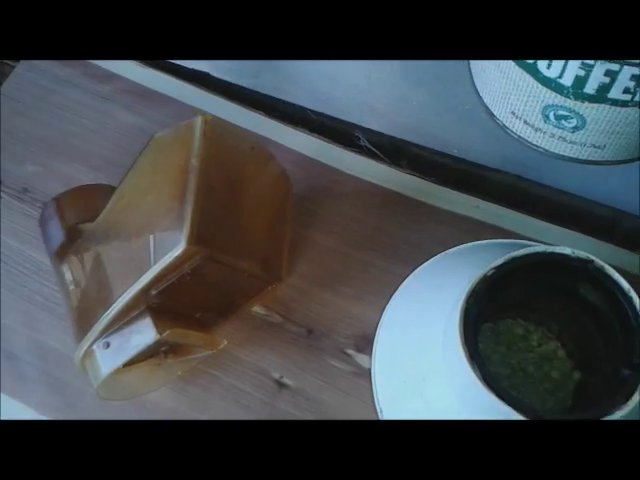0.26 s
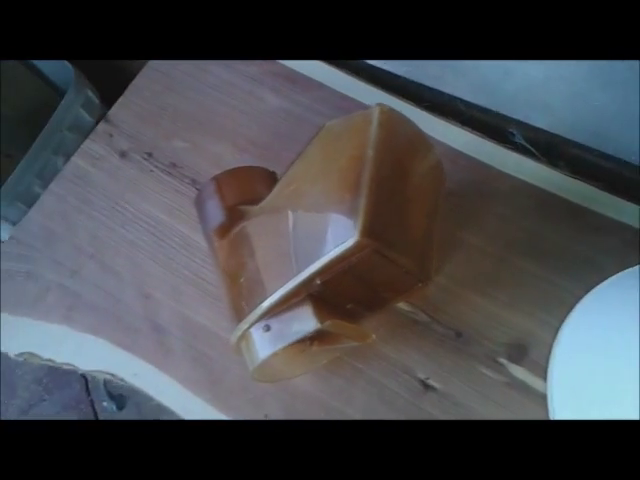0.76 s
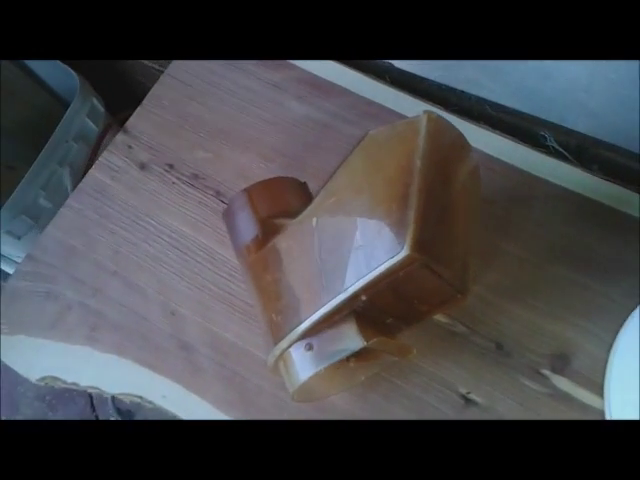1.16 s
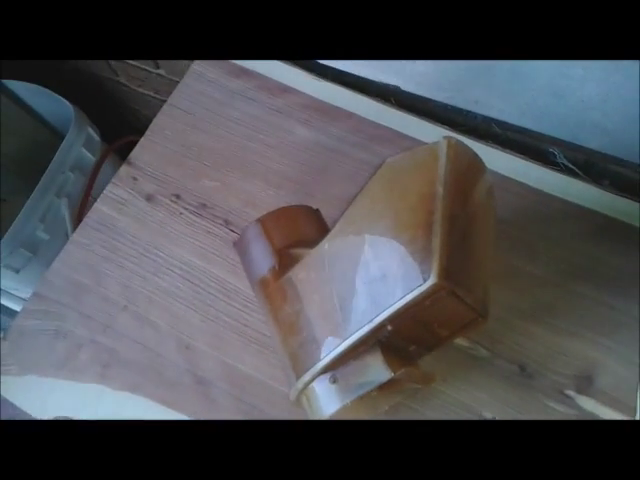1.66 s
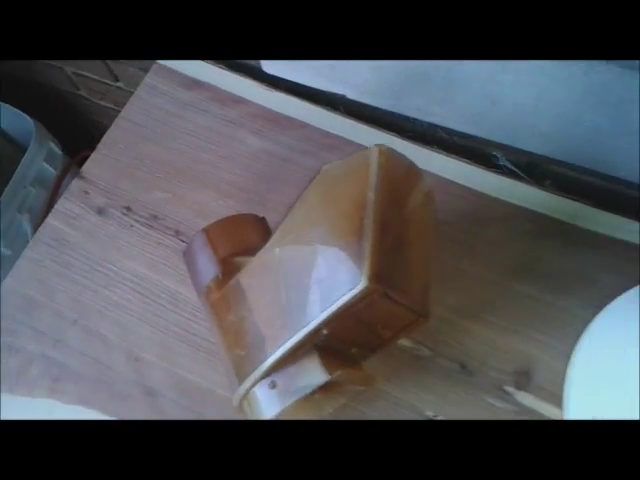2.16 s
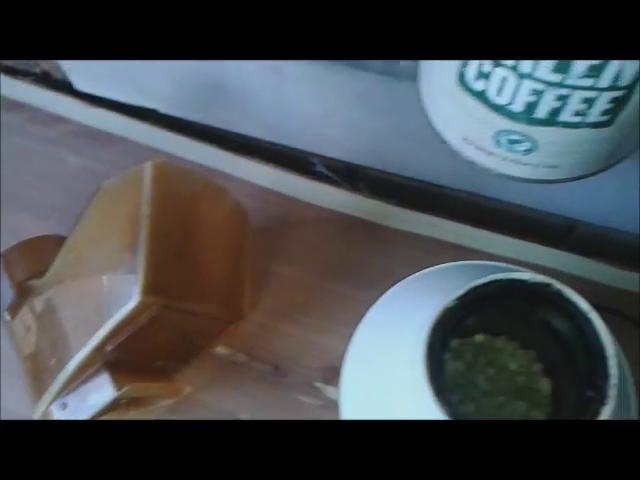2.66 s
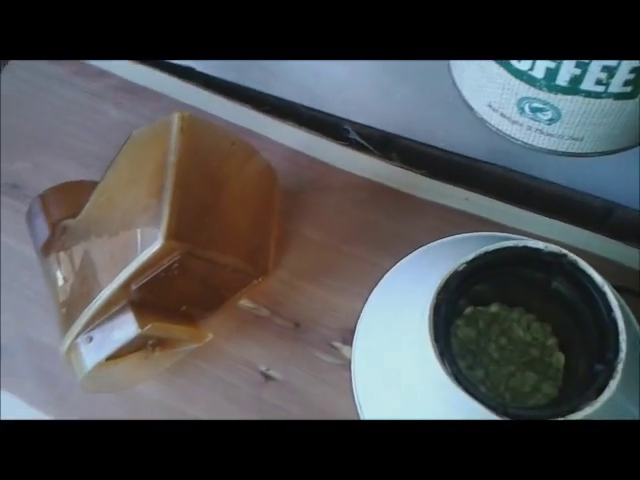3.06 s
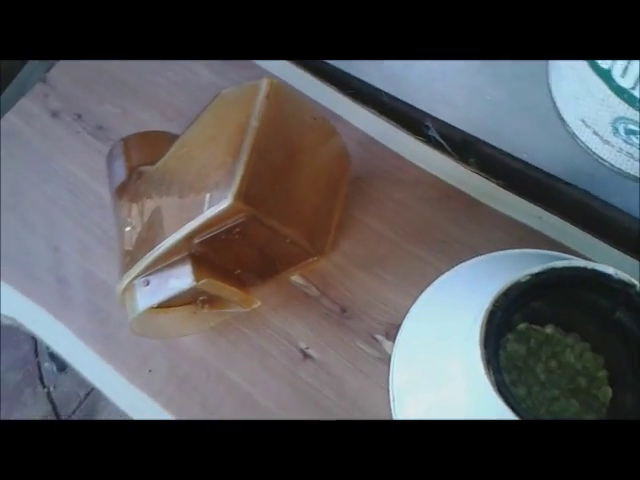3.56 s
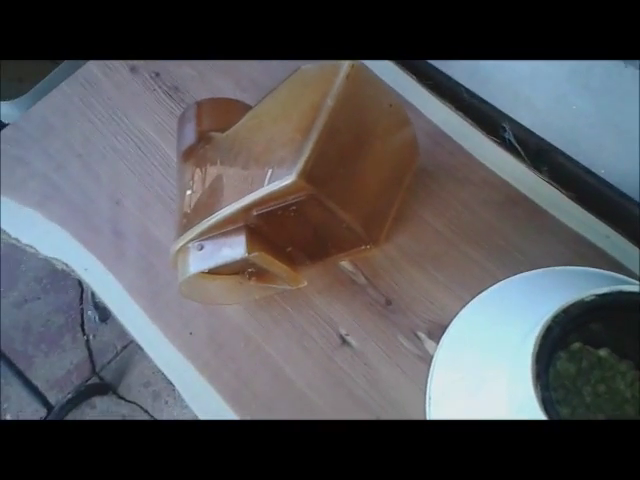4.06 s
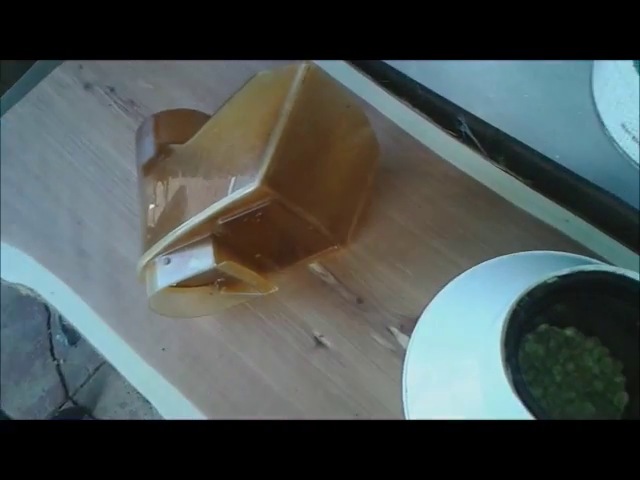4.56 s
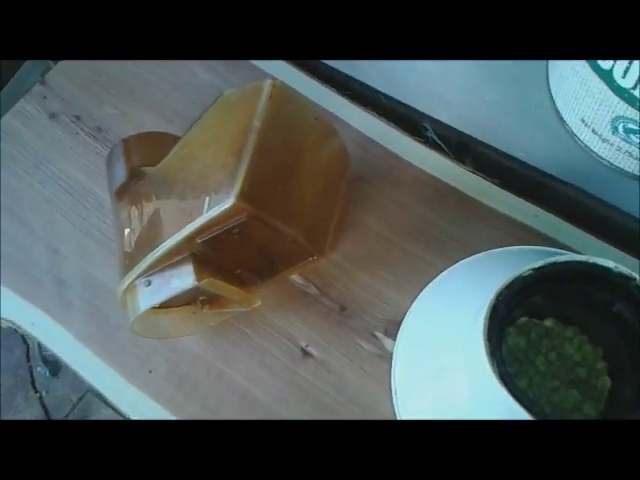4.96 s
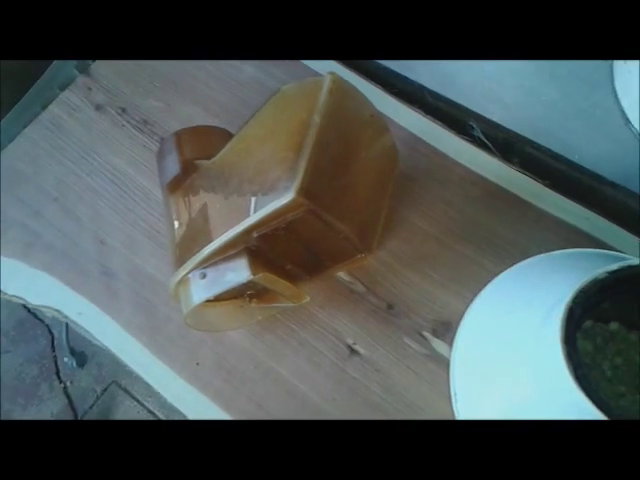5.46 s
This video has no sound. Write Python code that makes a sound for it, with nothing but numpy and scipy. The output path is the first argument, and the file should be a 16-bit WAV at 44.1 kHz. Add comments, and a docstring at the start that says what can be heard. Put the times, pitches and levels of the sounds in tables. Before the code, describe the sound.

Hard dry coffee beans clatter and rattle in short rushes against a hollow plastic container in a small, quiet kitchen, close up.

```python
"""Hard coffee beans, scooped from a plastic tub, are poured in short rushes on a kitchen worktop.
Random collisions, as dying noise bursts, clack the shells, rattle the walls and excite the hollow's modes.
Single beans land as brief contacts; scrapes are slips through one moving resonance; modes and thumps form
knocks at two moments, the second a cluster of three. Early on, faint wavering sines glide down as whistles.
Low noise gives handling; a small room answers, over a steady hush, through two resonant microphone ports."""
import sys
import numpy as np
from scipy import signal
from scipy.io import wavfile
from scipy.ndimage import uniform_filter1d

SR = 44100
rng = np.random.default_rng(int(sys.argv[2]) if len(sys.argv) > 2 else 0)


def materialize(psi):
    """Save the field psi as 16-bit PCM at rate SR to the path in sys.argv[1].

    A 1-D psi becomes a single channel; in a 2-D psi each row is a channel.
    """
    bounded = np.clip(np.atleast_2d(psi).T, -1, 1)
    quanta = np.round(bounded * 32767).astype(np.int16)
    wavfile.write(sys.argv[1], SR, quanta)


N = 251811  # length in samples

# Levels in the tables are relative: resonances, room and ports act on them later.
# Rushes of sliding beans. Each row: start in seconds, rise in seconds, hold in seconds,
# shell clack level in dB, wall rattle level in dB.
BEAN_RUSHES = [(0.0, 0.00075, 0.005, -34.5, -35), (0.134, 0.0081, 0.15, -59, -56),
               (1.253, 0.0075, 0.012, -38, -66), (1.385, 0.004, 0.152, -47.5, -44),
               (1.512, 0.051, 0.11, -33, -40), (1.686, 0.04, 0.15, -35, -44.5),
               (1.837, 0.055, 0.086, -31.5, -42), (1.996, 0.021, 0.12, -35.5, -46),
               (2.89, 0.033, 0.041, -71, -59.5), (2.954, 0.011, 0.011, -58, -39.5),
               (2.99, .04, 0.17, -57, -52.5), (3.184, 0.0091, 0.062, -32.5, -26),
               (3.285, 0.018, 0.043, -28.5, -26), (3.419, 0.067, 0.045, -28, -25),
               (3.536, 0.017, 0.0075, -25, -25), (3.595, 0.011, 0.037, -33.5, -28.5),
               (3.689, 0.079, 0.022, -35, -27.5), (3.837, .01, 0.19, -52.5, -42.5),
               (4.081, 0.037, .005, -46, -30), (4.125, 0.045, 0.014, -28, -26.5),
               (4.306, 0.036, 0.046, -37, -32), (4.427, 0.028, 0.26, -31, -33),
               (4.728, .01, 0.031, -39.5, -38), (4.793, 0.017, .04, -33, -32),
               (4.928, 0.0092, 0.083, -36.5, -38.5), (5.058, 0.015, 0.011, -28.5, -35.5),
               (5.195, 0.037, .06, -46, -41), (5.333, 0.011, 0.038, -39, -38)]
# Single beans landing. Each row: time in seconds, contact level in dB, wall rattle relative to it in dB.
BEAN_DROPS = [(0.0964, -4.5, -37), (0.1483, -11.5, -16.5), (0.1734, -11, -18), (0.2097, -20.5, -20),
              (0.2434, -22, -10.5), (0.471, -42.5, -3.5), (0.5521, -38, -16), (0.635, -44, 0.5),
              (0.7328, -14.5, -16.5), (1.1247, -39, -6.5), (1.2277, -39, -6.5), (1.258, -11.5, -18.5),
              (1.2684, -10, -30), (1.2768, -7.5, -52), (1.3825, -4, -28.5), (1.4215, -7.5, -45),
              (1.505, -12.5, -27), (1.5265, -6.5, -36), (1.559, -6.5, -33), (1.6052, -12.5, -28),
              (1.727, -9.5, -23.5), (1.7549, -6.5, -41), (1.8348, -11.5, -28), (1.9056, -11, -35.5),
              (2.0075, -13, -23), (2.0613, -11, -36), (2.1709, -9.5, -37), (2.185, -14, -27),
              (2.2482, -23, -27), (2.2916, -33, -27), (2.9615, -11, -10.5), (3.1921, -23, -12),
              (3.2254, -6.5, -16), (3.8605, -14.5, -11.5), (4.0106, -19.5, -12.5), (4.4997, -5.5, -29),
              (4.5468, -3, -35), (4.592, -9, -36), (4.7239, -3, -33), (4.7522, -14.5, -18),
              (4.8039, -6, -34), (4.8978, -4, -40), (4.9319, -0.5, -37), (4.9656, -9, -35.5),
              (5.0015, -5, -28), (5.022, -6, -36), (5.0589, -7.5, -23), (5.1286, -8, -10), (5.173, -4, -35),
              (5.1953, -10.5, -13.5), (5.2361, -3.5, -16.5), (5.2841, -8, -11), (5.34, -11.5, -11),
              (5.4035, -10, -19), (5.4458, -26.5, -6), (5.5136, -42, -2)]
# Spectrum of the clacking shells. Each row: frequency in Hz, relative level in dB.
SHELL_SPECTRUM = [(100, -20), (700, -79), (2000, -7), (4000, -4), (6500, -1), (9000, 6), (12000, 3),
                  (15000, -8)]
# Spectrum of the rattling container walls. Each row: frequency in Hz, relative level in dB.
WALL_SPECTRUM = [(40, -55), (150, -3), (330, -29), (750, -3), (1100, 2.5), (2200, 2), (3000, 3.5),
                 (4300, 0), (7000, -3.5), (14000, -8)]
# Modes of the container's air and base. Each row: frequency in Hz, relative level in dB, t60 in seconds.
HOLLOW_MODES = [(416, -32, 0.15), (465.5, 13, 0.071), (533, 1, 0.065), (995, 0.5, 0.07),
                (1004.4, 2.5, 0.12)]
# How freely the hollow rings as the heap changes. Each row: time in seconds, gain in dB.
HOLLOW_GAIN = [(0, -7), (.3, -3), (.6, -19), (1.5, -7), (2.3, -1.5), (3.2, -8.5), (3.9, -5.5), (4.6, -9.5),
               (5.7, -6)]
# How openly the shells' top treble is heard. Each row: time in seconds, gain in dB.
TREBLE_GAIN = [(.2, -34), (.7, -10), (1.3, 2), (2.2, 5), (3.1, -14), (4.2, -43), (4.7, -2), (5.4, -12)]
# Beans scraping along the scoop, one sub-table a stroke.
# Each row: time in seconds, resonance in Hz, relative level in dB.
SCRAPE_STROKES = [
    [(.38, 2320, -63), (.64, 2160, -60), (.8, 2280, -59)],
    [(3.85, 1870, -34), (3.91, 1850, -42), (3.95, 1890, -59)],
    [(4.32, 1890, -48), (4.365, 1900, -25.5), (4.42, 1900, -67)],
    [(5.27, 2170, -45), (5.35, 2230, -34.5), (5.44, 2290, -34), (5.5, 2290, -60.5)],
]
# Knocks of the container on the worktop. Each row: time in seconds, ring level in dB, thump level in dB.
CONTAINER_KNOCKS = [(2.963, -19.5, -24), (4.5241, -8.5, -30), (4.547, -29, -40), (4.561, -19.5, -45.5)]
# Modes of the knocked container. Each row: frequency in Hz, level in dB, t60 in seconds.
CONTAINER_MODES = [(220.5, -34, .08), (458.4, -4.5, 0.067), (507, -3.5, 0.031), (697, -16.5, 0.076),
                   (916, -8.5, 0.024), (1044, -26.5, 0.15), (1400, -42, 0.02)]
# Spectrum of the worktop's dull thump. Each row: frequency in Hz, relative level in dB.
THUMP_SPECTRUM = [(40, -39), (130, -16), (215, 7), (290, 8.5), (420, 8.5), (700, -5.5), (1100, -9),
                  (2500, -17.5), (8000, -16.5)]
# Faint gliding whistles. Each row: start in seconds, length in seconds, first frequency in Hz,
# last frequency in Hz, relative level in dB.
GLIDING_WHISTLES = [(0.399, 0.55, 13300, 10750, -55.5), (0.766, 0.15, 9200, 7800, -59),
                    (0.902, 0.11, 12600, 8500, -64.5)]
# Hands shifting things about. Each row: time in seconds, rumble level in dB.
HANDLING_LEVEL = [(0, -54.5), (.95, -57.5), (1.03, -55), (1.4, -52), (1.8, -63), (2.9, -59.5),
                  (3.15, -50.5), (4.2, -52.5), (4.7, -45.5), (5.7, -58)]
# Spectrum of the handling rumble. Each row: frequency in Hz, relative level in dB.
HANDLING_SPECTRUM = [(20, -8), (50, -8), (85, 1), (150, -2), (250, -13.5), (450, -10.5), (1500, -37.5)]
# Decay of the small room. Each row: frequency in Hz, t60 in seconds.
ROOM_DECAY = [(250, 0.49), (700, 0.12), (2000, 0.28), (5000, 0.2), (12000, 0.066)]
# Resonances of the two microphone ports. Each row: frequency in Hz, gain in dB.
LEFT_PORT_GAIN = [(600, -2.5), (2300, -4), (4400, 0), (6000, 7.5), (7000, 7.5), (8000, 12), (9050, 16),
                  (10000, 13), (11000, 7.5), (14500, -3)]
RIGHT_PORT_GAIN = [(600, -2.5), (2300, 4), (4400, 1.5), (5500, 6.5), (6300, 13.5), (7000, 19), (8000, 8.5),
                   (9000, 3.5), (11000, -3.5), (14500, -19)]
# Spectrum of the steady background hush. Each row: frequency in Hz, relative level in dB.
HUSH_SPECTRUM = [(15, -62), (25, -18), (47, -1), (85, -4), (120, -30), (149, -4), (234, -9), (275, -59),
                 (520, -14.5), (1720, -25.5), (5130, -24), (5560, -31), (14500, -32)]

SWELL_DB = 13.5  # a rush climbs this far during its rise
SETTLE_DB_PER_S = 263  # then the heap comes to rest
# the harder the heap pushes on the wall, the more beans collide
FULL_FLOW_DB, COLLISIONS_PER_S, FEWEST_PER_S = -26, 2200, 630
PORT_LAG = 10  # samples by which the right port hears bean contacts later
EDGE_HZ = 14900  # upper band limit
ROOM_TONE_DB = -60


def beans():
    """Forced vibration: rushes and single drops are coloured by the structures they set ringing."""
    shells, walls = flow()
    # every bean has its own pitch, and strikes the wall at a different spot
    shells = shifting(shells, depth_db=3.0, patch_s=.004, patch_hz=1400, size=128)
    walls = shifting(walls, depth_db=2.5, patch_s=.025, patch_hz=450, size=256)
    shells, walls = np.array([shells, walls]) + drops()

    clack = tint(shells, colour(SHELL_SPECTRUM))
    top_treble = colour([(7000, -24.5), (10000, -1.0), (12500, 5.5), (15000, 0.5)])
    snap = level(TREBLE_GAIN, axis=1) * tint(shells, top_treble)
    rattle = tint(walls, colour(WALL_SPECTRUM))
    # long waves reach both ports alike; the moving heap damps now one mode, now another
    boom = tint(walls.mean(0), ring(HOLLOW_MODES))
    boom = shifting(boom, depth_db=3.0, patch_s=.07, patch_hz=130, size=1024)
    return clack + snap + rattle + level(HOLLOW_GAIN, axis=1) * boom


def flow(spread_db=4.0, shell_s=.001, wall_s=.003):
    """Granular flow: collisions snap the shells and rattle the walls a little longer."""
    power = np.array([swell(*row[:3]) for row in BEAN_RUSHES]) ** 2
    rush_power = amp(np.array(BEAN_RUSHES)[:, 3:].T) ** 2
    clack, wall = np.sqrt(rush_power @ power)  # overlapping rushes add in power
    per_s = FEWEST_PER_S + COLLISIONS_PER_S * wall / amp(FULL_FLOW_DB)
    energy = collisions(per_s, spread_db)
    return np.array([clack * bursts(energy, shell_s), wall * bursts(energy, wall_s)])


def swell(start, rise_s, hold_s):
    """Acceleration and friction: the beans of one rush speed up, run on and settle."""
    t = np.arange(N) / SR - start
    climb = SWELL_DB * np.minimum(t / max(rise_s, 1 / SR) - 1, 0)
    settling_s = np.maximum(t - rise_s - hold_s, 0)
    return (t >= 0) * amp(climb - SETTLE_DB_PER_S * settling_s)


def collisions(per_s, spread_db):
    """Random impacts: energies at independent moments, mostly small with a few large."""
    energy = amp(spread_db * np.minimum(rng.exponential(1, N), 3)) ** 2
    struck = rng.random(N) < per_s / SR
    return energy * struck / per_s  # the rate leaves the mean power unchanged


def bursts(energy, decay_s):
    """Exponential damping: each collision starts its own short dying burst."""
    power = signal.lfilter([1], [1, -np.exp(-2 / (decay_s * SR))], energy)
    return unit(chatter(N) * np.sqrt(power))


def chatter(size, alike=0.24):
    """Partial coherence: micro-bounces share some noise, which reaches the left port first."""
    shared, left, right = rng.standard_normal((3, size))
    common = np.array([shared, np.roll(shared, PORT_LAG)])
    return np.sqrt(alike) * common + np.sqrt(1 - alike) * np.array([left, right])


def shifting(x, depth_db, patch_s, patch_hz, size):
    """Varying modal excitation: patches of time and pitch swell and fade, alike at both ports."""
    z = signal.stft(x, SR, nperseg=size)[2]
    field = rng.standard_normal(z.shape[-2:])
    for axis, width in enumerate((patch_hz * size / SR, 2 * patch_s * SR / size)):
        field = uniform_filter1d(field, max(round(width), 1), axis)
    gain = amp(depth_db * unit(field))
    return signal.istft(z * unit(gain), SR, nperseg=size)[1][..., :N]


def drops(clack_db=5.0, wall_db=21):
    """Isolated impacts: single beans strike the same shells and walls."""
    shells, walls = np.zeros((2, 2, N))
    for s, db, wall_rel_db in BEAN_DROPS:
        add(shells, s, amp(db) * contact(snap_s=.0013, bounce_s=.005, bounce_db=-13, rise_s=.0007))
        add(walls, s, amp(db + wall_rel_db) * contact(snap_s=0.0035, bounce_s=0.0039, bounce_db=-2.5))
    return np.array([amp(clack_db) * shells, amp(wall_db) * walls])


def contact(snap_s, bounce_s, bounce_db, rise_s=0.00058, size=1100):
    """Impact and rebound: a quick rise, a short snap and a weaker, longer run of micro-bounces."""
    t = np.arange(size) / SR
    decay = np.exp(-t / snap_s) + amp(bounce_db) * np.exp(-t / bounce_s)
    pair = chatter(size) * decay * (1 - np.exp(-t / rise_s))
    return pair / np.linalg.norm(pair, axis=1, keepdims=True)  # equal energy at each port


def scrapes(width_hz=300, db=-2):
    """Stick-slip excitation: sliding beans drive one resonance of the scoop, which moves as it empties."""
    s, hz, _ = np.concatenate(SCRAPE_STROKES).T
    track_hz = np.interp(np.arange(N) / SR, s, hz)
    turn = np.exp(2j * np.pi * np.cumsum(track_hz) / SR)
    slips = bursts(collisions(per_s=350, spread_db=4), decay_s=.001)
    # shift the moving resonance to 0 Hz, filter it there with a double pole, and shift it back
    r = np.exp(-2 * np.pi * width_hz / SR)
    tone = (turn * signal.lfilter([1], np.poly([r, r]), slips / turn)).real
    return amp(db) * unit(tone) * sum(level(rows, axis=2) for rows in SCRAPE_STROKES)


def knocks(thump_s=0.026, lowest_hz=220, shudder_s=0.057, shudder_db=-13, shudder_low_hz=170, shudder_high_hz=460):
    """Impulse response: a knock rings the container and thumps the worktop, dying in a low shudder."""
    out, t = np.zeros((2, N)), np.arange(SR // 3) / SR
    # a small box radiates little bass
    body = signal.lfilter(*signal.butter(2, lowest_hz, "high", fs=SR), ring(CONTAINER_MODES))
    band = signal.butter(2, [shudder_low_hz, shudder_high_hz], "band", fs=SR)
    for s, ring_db, thump_db in CONTAINER_KNOCKS:
        blow = rng.standard_normal(len(t)) * np.exp(-t / thump_s)
        thump = tint(blow, colour(THUMP_SPECTRUM))[:, :len(t)]
        low_noise = unit(signal.lfilter(*band, rng.standard_normal(len(t))))
        shudder = amp(shudder_db) * low_noise * np.exp(-t / shudder_s)
        add(out, s, amp(ring_db) * body + amp(thump_db) * (thump + shudder))
    return out


def whistles(waver_hz=110):
    """Frequency modulation: each tone flutters and fades as its wavering pitch falls ever faster."""
    out = np.zeros((2, N))
    for start, length, from_hz, to_hz, db in GLIDING_WHISTLES:
        u = np.arange(0, length, 1 / SR) / length
        slow_noise = unit(uniform_filter1d(rng.standard_normal((2, N)), size=600))
        waver, flutter = slow_noise[:, :len(u)]
        hz = from_hz + (to_hz - from_hz) * u ** 1.4 + waver_hz * waver
        tone = np.sin(2 * np.pi * np.cumsum(hz) / SR)
        fade = np.sqrt(np.sin(np.pi * u))
        add(out, start, amp(db) * flutter * fade * tone[None])
    return out


def handling():
    """Low-passed friction noise: hands shifting things about make a rumble of changing level."""
    return level(HANDLING_LEVEL, axis=1) * hush(HANDLING_SPECTRUM)


def kitchen(x, size=15000, count=1500):
    """Reverberation: sparse reflections off worktop and walls, each band dying at its own speed."""
    taps = np.zeros((2, size))
    at = rng.integers(SR // 300, size, (2, 2 * count))
    np.put_along_axis(taps, at, rng.choice([-1., 1.], at.shape), 1)
    hz, t, z = signal.stft(taps, SR, nperseg=256)
    decay = np.exp(-np.log(1000) * t / read(ROOM_DECAY, hz)[:, None])
    tail = signal.istft(z * decay, SR, nperseg=256)[1]
    return convolve(x, tail / np.linalg.norm(tail, axis=1, keepdims=True))


def hush(points):
    """Spatial coherence: noise of the given spectrum whose bass is mostly shared by both ports."""
    shared, apart = rng.standard_normal((2, N))
    width = convolve(apart, colour([(200, -13.0), (600, -7.0), (1500, 0)]))[0]
    return unit(tint(np.array([shared + width, shared - width]), colour(points)))


def ring(modes):
    """Modal superposition: a sum of exponentially dying sines."""
    t = np.arange(SR // 3) / SR
    return sum(amp(db) * np.exp(-np.log(1000) * t / t60) * np.sin(2 * np.pi * hz * t)
               for hz, db, t60 in modes)


def colour(points, size=2048):
    """Minimum phase: the causal impulse response with the given spectrum."""
    log_gain = np.log(amp(read(points, abs(np.fft.fftfreq(size, 1 / SR)))))
    response = np.exp(np.conj(signal.hilbert(log_gain)))
    return np.fft.ifft(response).real[:size // 2]


def tint(x, kernel):
    """Power conservation: filters without changing the power of white sound."""
    return convolve(x, kernel / np.linalg.norm(kernel))


def convolve(x, kernel):
    """Linear filtering: convolves each channel, keeping at most N samples."""
    return signal.oaconvolve(np.atleast_2d(x), np.atleast_2d(kernel), axes=1)[:, :N]


def read(points, hz):
    """Logarithmic pitch: joins a spectrum table on a log-frequency axis."""
    f, value = np.transpose(points)
    return np.interp(np.log(hz + 1), np.log(f + 1), value)


def level(rows, axis):
    """Logarithmic level: one dB column as a gain per sample, silent outside its span."""
    rows = np.asarray(rows)
    return amp(np.interp(np.arange(N) / SR, rows[:, 0], rows[:, axis], left=-200, right=-200))


def add(mix, s, sound):
    """Linear superposition: adds a sound to both channels at time s."""
    part = mix[:, max(round(s * SR), 0):][:, :sound.shape[1]]
    part += sound[:, :part.shape[1]]


def amp(db):
    """Decibel law: level to amplitude gain."""
    return 10 ** (np.asarray(db) / 20)


def unit(x):
    """Mean power: scales to rms 1 over all channels together."""
    return x / np.sqrt(np.mean(x ** 2) + 1e-20)


def scene():
    """Superposition: beans, scrapes and knocks with their room sound, then whistles and handling."""
    rattle = beans() + scrapes()
    bumps = knocks()
    reflections = kitchen(amp(-8.5) * rattle + amp(-9.5) * bumps)
    return rattle + bumps + reflections + whistles() + handling()


def record(dry, low_cut_hz=48):
    """Transduction: port resonances, low cut, background hush, clipping near full scale and band limit."""
    ports = convolve(dry, np.array([colour(LEFT_PORT_GAIN), colour(RIGHT_PORT_GAIN)]))
    low_cut = signal.butter(2, low_cut_hz, "high", fs=SR, output="sos")
    ports = signal.sosfilt(low_cut, ports)
    heard = np.clip(ports + amp(ROOM_TONE_DB) * hush(HUSH_SPECTRUM), -.9, .9)
    band_limit = signal.firwin(127, EDGE_HZ, window=("kaiser", 8), fs=SR)
    return signal.oaconvolve(heard, band_limit[None], "same", axes=1)


dry = scene()
out = record(dry)
materialize(out)
```